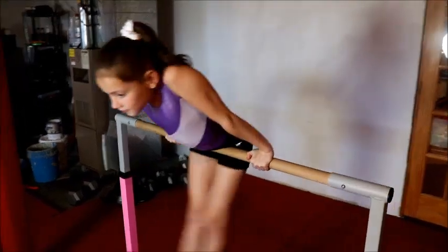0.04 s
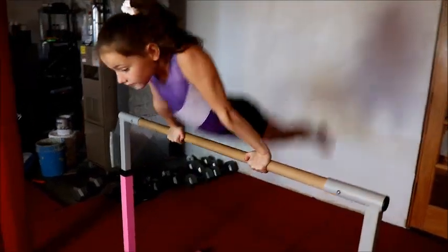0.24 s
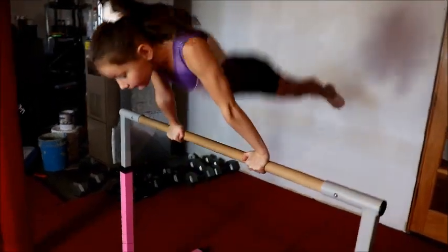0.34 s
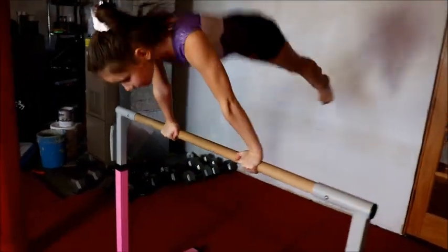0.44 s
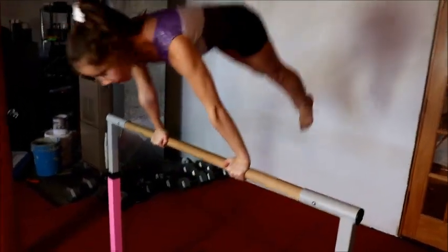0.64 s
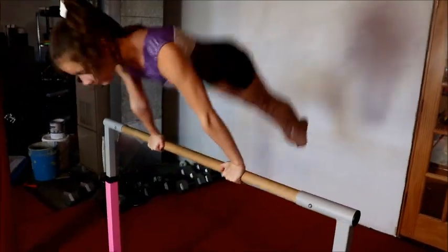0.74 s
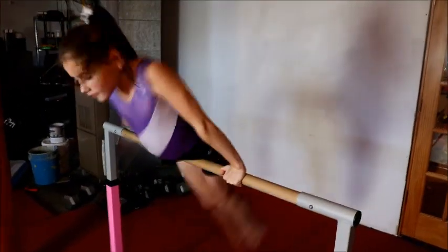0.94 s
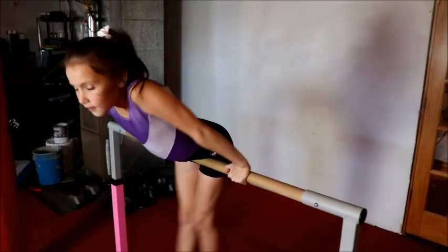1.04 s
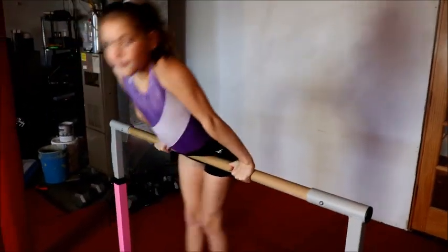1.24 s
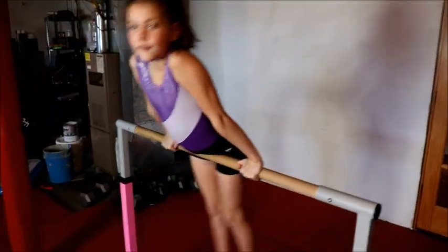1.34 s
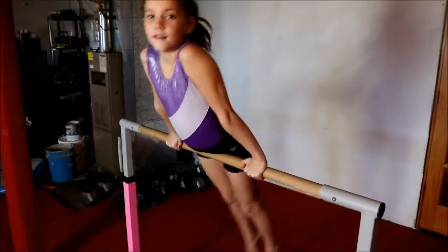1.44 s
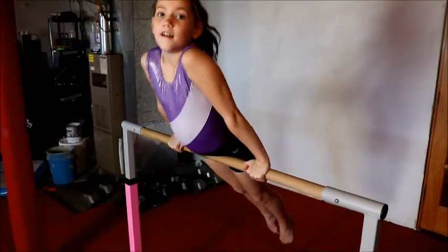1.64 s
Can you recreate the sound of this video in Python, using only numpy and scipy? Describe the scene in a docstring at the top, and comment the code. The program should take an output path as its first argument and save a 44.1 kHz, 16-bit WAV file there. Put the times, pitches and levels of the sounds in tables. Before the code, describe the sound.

Loose wooden bar on steel posts clanks sharply, squeaks briefly, then thuds and rattles under a gymnast

```python
"""Knocks and ringing steel, a short squeak, then soft thuds and a last rattle, over quiet room air.
A gymnast swings on a wooden rail between two steel uprights, in a small hard-walled practice room.
Loose joints knock as the load changes: filtered noise bursts plus fading sine waves for the steel.
The rail squeaks in its socket (an uneven tone with overtones and rasp), then the hips land on it:
soft noise bursts for the thuds, a low sine wave for the rocking frame, tiny random ticks for the chatter."""
import sys
import numpy as np
from scipy import signal
from scipy.fft import rfft, irfft, next_fast_len
from scipy.io import wavfile

SR = 44100
rng = np.random.default_rng(int(sys.argv[2]) if len(sys.argv) > 2 else 0)


def master(y):
    """Save y as 16-bit WAV."""
    cut = np.clip(np.atleast_2d(y).T, -1, 1)
    pcm = np.round(cut * 32767)  # scale
    wavfile.write(sys.argv[1], SR, pcm.astype(np.int16))


N = 74970  # length of the scene in samples


def amp(db):
    """Turn decibels into a gain."""
    return 10 ** (np.asarray(db) / 20)


def unit(x):
    """Scale a signal to an rms of 1."""
    return x / np.sqrt(np.mean(x ** 2) + 1e-20)


def fade(t, t60):
    """Exponential decay that falls by 60 dB in t60 seconds."""
    return np.exp(-np.log(1000) * t / t60)


def along(points, hz):
    """Read a curve of (f/Hz, value) points, with straight lines on a log frequency axis."""
    f, value = np.transpose(points)
    return np.interp(np.log(hz + 1), np.log(f + 1), value)


def clock():
    """The time of every sample in seconds."""
    return np.arange(N) / SR


def coloured(x, spectrum, size=4096):
    """Filter x to a curve of (f/Hz, level/dB) points, with nothing sounding ahead of its cause."""
    hz = np.fft.rfftfreq(size, 1 / SR)
    cepstrum = irfft(np.log(amp(along(spectrum, hz))))
    # folding the cepstrum on to positive times gives a minimum-phase filter
    cepstrum[1:size // 2] *= 2
    cepstrum[size // 2 + 1:] = 0
    impulse = irfft(np.exp(rfft(cepstrum)))
    return signal.oaconvolve(x, impulse)[:len(x)]


def burst(spectrum, envelope, size=4096):
    """Random +1/-1 noise shaped by an envelope, then filtered; the filter's overall gain is evened out."""
    hz = np.fft.rfftfreq(size, 1 / SR)
    power = np.mean(amp(along(spectrum, hz)) ** 2)
    noise = np.sign(rng.random(len(envelope)) - .5)
    return coloured(noise * envelope, spectrum) / np.sqrt(power)


def wobble(rate, t):
    """A random curve over the times t: straight lines between `rate` random points a second."""
    points = rng.standard_normal(SR // 20)
    return np.interp(t * rate, np.arange(len(points)), points)


def add(out, start_s, x):
    """Mix x into out from the given time."""
    i = max(round(start_s * SR), 0)
    out[i:i + len(x)] += x[:N - i]


def knocks():
    """A joint takes up its play: a crack of contact, a short clatter and the ring of the steel."""
    # one row per knock [t/s, level/dB, bass/dB, middle/dB, treble/dB, top/dB, contact time constant/s,
    # crack/dB, ring/dB, part that rings]
    knock_table = [ (0.1445, -35.5, 1.5, 8, -14, -5.5, 0.00379, -9.5, -8.5, "base"),
                   (0.2357, -16.5, -11.5, 1.5, -4.5, -16.5, 0.00222, 0.5, -8.5, "base"),
                   (0.265, -16.5, -3, 1.5, 3.5, -1, 0.000586, 1, -1, "far post"),
                   (0.351, -22, -7, -13, -10.5, -12.5, 0.00212, -4, 0, "far post"),
                   (.500, -38, -3.5, 1.5, -17, -2.5, 0.00247, -10.5, 0, "far post"),
                   (0.558, -42, -10, 10, -2, -5.5, 0.0027, -15, -3, "far post"),
                   (0.768, -46.5, 18, 5, -23.5, -12.5, 0.00695, 2, -18.5, "base"),
                   (0.8661, -41, 3.5, 4, -8, -4, 0.00093, -10.5, -1, "far post"),
                   (0.9812, -43.5, 9, 8.5, -13, -9.5, 0.000373, -2.5, -8, "base"),
                   (1.0758, -25, -2, 3, 1.5, -21.5, 0.00109, -2, -4.5, "near post"),
                   (1.118, -37.5, 14, -8.5, -8.5, -5.5, 0.00119, -3, -6, "near post"),
                   (1.2158, -38.5, -1.5, 6, -13, -13, 0.00094, -18, 0.5, "base"),
                   (1.3431, -27, -12, 4, -7, -25.5, 0.00395, -5.5, -5, "rail"),
                   (1.4098, -22.5, 2, -10, 4, 2, 0.00159, 1, -1.5, "near post"),
                   (1.421, -29, -0.5, 2.5, 3.5, 7, 0.000333, -4.5, 2, "near post"), ]
    # ways each part of the frame can ring [f/Hz, relative level/dB, t60/s]
    frame_modes = { "far post": [(100.1, -25, .7), (195.67, -21.5, 1), (435.7, -15.5, 0.69),
                   (518.6, -21, 0.34), (708, 2, 0.3277), (1694, -12.5, 0.224), (1812.7, -22, 0.82),
                   (2302, -16, 0.48), (2869, -25, 0.73), (3128, -14.5, 0.54), (3610, -15, 0.35),
                   (3880, -27.5, 0.577), (4162, -14, .07)], "near post": [(339.13, -6.5, 0.283),
                   (443.8, -7, 0.223), (599.2, -7, 0.285), (712.1, -2, 0.377), (1791, -19.5, .4),
                   (1861.3, -5, 0.402), (2126.3, -12, 0.396), (3300, -10, 0.277), (3862, -1.5, 0.083),
                   (4080, 2, 0.0333)], "base": [(217.9, -9, 1), (454.7, -2.5, .25), (634.5, -2.5, 0.74),
                   (1063.5, -0.5, 0.409), (1671, -13, 0.26), (2243.5, -7, 0.225), (3378, -3.5, 0.087)],
                   "rail": [(616.7, -1, .35), (1938, 1.5, 0.0556), (3085, -2.5, 0.146), (3403, -12, 0.126),
                   (5375, -12.5, 0.065)], }
    # tone of the dense wood-and-steel clatter [f/Hz, relative level/dB]
    clatter_spectrum = [(40, -10), (130, -12.5), (255, -9.5), (330, 0), (720, 3.5), (1300, -8), (2600, -7),
                        (4100, -3.5), (5600, -14), (10000, -20), (15500, -29)]
    # tone of the contact itself [f/Hz, relative level/dB]
    crack_spectrum = [(80, -19.5), (230, -3), (340, 4), (700, 1.5), (1600, -6.5), (2900, -8), (4100, 6.5),
                      (5400, -1.5), (10000, -9.5), (15500, -12)]
    clatter_t60_s, crack_t60_s = 0.06313, 0.00808
    crack_offset_db, ring_offset_db = 9, -3  # added to each knock's own values
    ring_waver_rad = 0.888  # the loose joints unsettle the phase of each mode

    out = np.zeros(N)
    t = clock()[:SR // 2]
    for start_s, db, bass_db, middle_db, treble_db, top_db, contact_s, crack_db, ring_db, part in knock_table:
        touch = 1 - np.exp(-(t / contact_s) ** 2)  # a longer contact starts more gently
        # a longer contact also makes the crack last longer
        crack = burst(crack_spectrum, touch * fade(t, crack_t60_s + 2 * contact_s))
        clatter = burst(clatter_spectrum, touch * fade(t, clatter_t60_s))
        blow = amp(crack_offset_db + crack_db) * crack + clatter

        ring = np.zeros(len(t))
        for hz, level_db, t60 in frame_modes[part]:
            waver = ring_waver_rad * wobble(69.67, t)
            phase = 2 * np.pi * (hz * t + rng.random()) + waver
            ring += amp(level_db) * fade(t, t60) * np.sin(phase)
        steel = amp(ring_offset_db + ring_db) * touch * ring

        # tone of this knock (f/Hz, level/dB), held at 0 dB at 3620 Hz
        colour = [(343, bass_db), (1390, middle_db), (3620, 0), (8230, treble_db), (13200, top_db)]
        add(out, start_s, amp(db) * coloured(blow + room(blow) + steel, colour))
    return out


def squeak():
    """The rail sticks and slips unevenly in its socket; the slips drive a mode of the post, which rings on."""
    # path of the squeak [t/s, slip rate before jitter f/Hz, level of the lowest tone/dB]
    slip_path = [(0.601, 827, -46), (0.607, 818.9, -36), (0.619, 828.3, -31.5), (0.62, 764.9, -33.5),
                 (.631, 716.5, -22), (0.644, 732.9, -26.5), (0.647, 776.5, -21.5), (0.659, 716.6, -25),
                 (.678, 726.6, -28.5), (0.685, 694, -40)]
    # overtones from the second harmonic upwards, at full grip [level relative to the lowest tone/dB]
    overtone_levels = [-18.5, -18, -28.5, -21, -36]
    # tone of the wood fibres rasping as they slip [f/Hz, relative level/dB]
    rasp_spectrum = [(300, -14.5), (900, -4), (1500, 7.5), (3800, -0.5), (5200, -6.5), (8000, -13),
                     (15000, -47.5)]
    rasp_db = -17
    grip_s, grip_length_s, loose_db = .634, 0.0211, -14.5
    jitter = 0.01254  # typical random change of slip rate, as a fraction
    scatter_rad, scatter_per_s = .2, 220  # phase unrest that is multiplied by the harmonic number
    post_hz, post_t60_s, post_db = 710, 0.256, 3.5
    tone_room_db, edge_room_db = -11.5, -4.5

    t = clock()
    s, hz, db = np.transpose(slip_path)
    sounding = (t > s[0]) * (t < s[-1])
    level = np.sqrt(2) * amp(np.interp(t, s, db)) * sounding
    slip_rate = np.interp(t, s, hz) * (1 + jitter * wobble(300, t))
    phase = 2 * np.pi * np.cumsum(slip_rate) / SR
    tone = level * np.sin(phase)

    # overtones and rasp are strongest while the wood grips hardest
    looseness = 1 - np.exp(-((t - grip_s) / grip_length_s) ** 2)
    grip = amp(loose_db * looseness)
    overtones = np.zeros(N)
    for harmonic, overtone_db in enumerate(overtone_levels, 2):
        uneven_phase = phase + scatter_rad * wobble(scatter_per_s, t)
        overtones += amp(overtone_db) * np.sin(harmonic * uneven_phase)
    rasp = burst(rasp_spectrum, (1 + np.cos(phase)) / 2)  # swells once per slip
    edge = level * grip * (overtones + amp(rasp_db) * rasp)

    decay = fade(t, post_t60_s)
    post_response = 2 * decay * np.cos(2 * np.pi * post_hz * t) / decay.sum()
    post = signal.fftconvolve(tone, post_response)[:N]
    echo = room(amp(tone_room_db) * tone + amp(edge_room_db) * edge)
    return tone + edge + amp(post_db) * post + echo


def thuds():
    """The hips press softly into the rail: noise that swells in and fades, with the room's answer."""
    # soft blows of the body [t/s, level/dB, rise time constant/s, t60/s]
    thud_table = [(.987, -27, 0.01113, 0.2244), (1.245, -34.5, 0.0055, 0.179)]
    # tone of a thud [f/Hz, relative level/dB]
    thud_spectrum = [(30, -12.5), (100, 6.5), (200, -4.5), (380, 7.5), (720, 4.5), (1300, 0), (2200, -8.5),
                     (4000, -16.5), (6500, -29.5), (15000, -45.5)]
    out, t = np.zeros(N), clock()
    for start_s, db, rise_s, t60 in thud_table:
        envelope = (1 - np.exp(-t / rise_s)) * fade(t, t60)
        add(out, start_s, amp(db) * burst(thud_spectrum, envelope))
    return out + amp(-4) * room(out)


def rocking():
    """The frame rocks dully on the floor: a low, slightly unsteady sine wave that swells and fades."""
    # each rock of the frame [t/s, level/dB]
    rock_table = [(1.00, -50.5), (1.11, -45.5), (1.445, -38)]
    rock_hz, rock_t60_s, rise_s = 49.26, 0.31, 0.0285
    out, t = np.zeros(N), clock()
    for start_s, db in rock_table:
        envelope = (1 - np.exp(-t / rise_s)) * fade(t, rock_t60_s)
        phase = 2 * np.pi * rock_hz * t + 0.65 * wobble(38.6, t)
        add(out, start_s, amp(db) * envelope * np.sin(phase))
    return out


def chatter():
    """Tiny random contacts in the joints while the frame is under load."""
    # loudness of the chatter before the final mix [t/s, level/dB]
    chatter_level = [(0, -56.5), (.12, -68), (.3, -41.5), (.56, -50.5), (0.799, -59), (.94, -59),
                     (1.051, -39.5), (1.27, -47.5), (1.45, -56.5), (1.69, -104.5)]
    # tone of the chatter [f/Hz, relative level/dB]
    chatter_spectrum = [(100, -15.5), (250, -1), (650, 8.5), (1400, -8), (3800, -12.5), (6500, -17),
                        (15000, -31.5)]
    ticks_per_s = 700  # on average
    strength = amp(2 * rng.standard_normal(N))  # ticks vary by about 2 dB
    ticks = (rng.random(N) < ticks_per_s / SR) * strength
    level = amp(np.interp(clock(), *np.transpose(chatter_level)))
    direct = burst(chatter_spectrum, unit(ticks) * level)
    return amp(-5.5) * direct + amp(-1.5) * room(direct)


def room(x):
    """The walls answer with a spread-out tail of noise that fades at its own speed in each pitch range."""
    # how long the room rings [f/Hz, t60/s]
    room_t60 = [(100, 1.1), (300, 0.29), (700, 0.61), (1800, 0.66), (4500, 0.3362), (8000, 0.44),
                (13000, 0.01)]
    # tone of the room's answer [f/Hz, relative level/dB]
    room_colour = [(100, -4), (210, -6.5), (330, 1), (800, -0.5), (2000, 4), (4300, -1.5), (7000, -10),
                   (13000, -8.5)]
    room_db, build_s = -0.035, 0.0026  # build_s: time constant of the tail's start
    hz, t, z = signal.stft(rng.standard_normal(SR // 2), SR, nperseg=512)
    t60 = along(room_t60, hz)
    z = z * fade(t, t60[:, None])
    energy = np.sqrt(t60 * SR / (2 * np.log(1000)))  # evens out long and short decays
    gain = amp(along(room_colour, hz)) / energy
    tail = signal.istft(z * gain[:, None], SR, nperseg=512)[1]
    tail = tail * (1 - np.exp(-clock()[:len(tail)] / build_s))
    return amp(room_db) * signal.fftconvolve(x, tail)[:len(x)]


def still_air():
    """The quiet air of the room: steady filtered noise."""
    # tone of the air [f/Hz, relative level/dB]
    air_spectrum = [(25, -22), (60, 1.5), (110, 4.5), (170, -4), (400, 5), (700, -12.5), (1100, -7.5),
                    (2000, -13), (4500, -18), (10000, -21.5), (16000, -22)]
    return amp(-58.5) * burst(air_spectrum, np.ones(N))


def scene():
    """The whole apparatus over the quiet of the room, as one channel."""
    mix = knocks() + squeak() + thuds() + rocking() + chatter() + still_air()
    return mix[None]


def record(dry):
    """Remove everything at or above the upper band limit."""
    top_hz = 16200
    size = next_fast_len(N + SR // 2)  # spare silence keeps the end from wrapping round to the start
    kept = np.fft.rfftfreq(size, 1 / SR) < top_hz
    return irfft(rfft(dry, size) * kept, size)[..., :N]


dry = scene()
out = record(dry)
master(out)
```